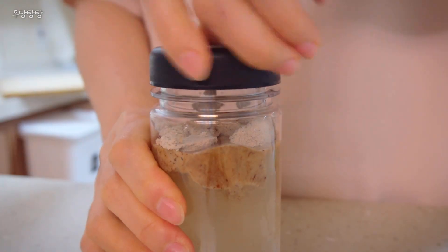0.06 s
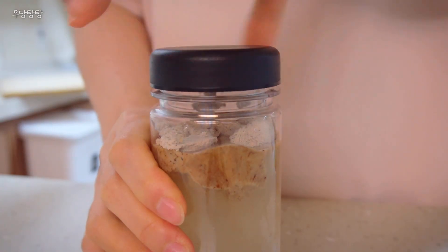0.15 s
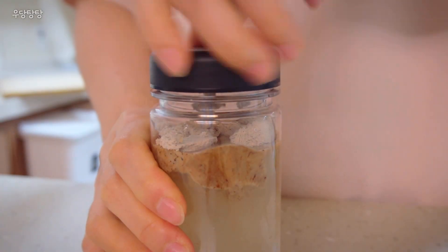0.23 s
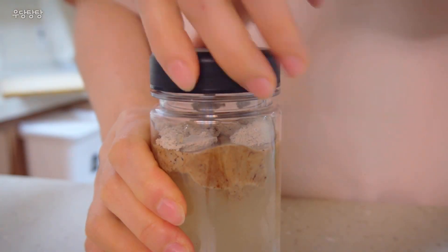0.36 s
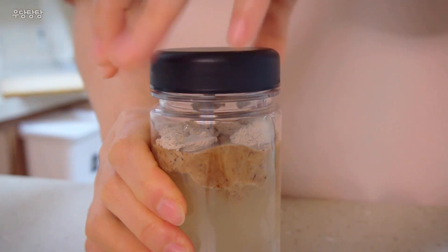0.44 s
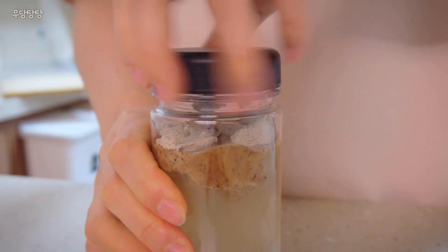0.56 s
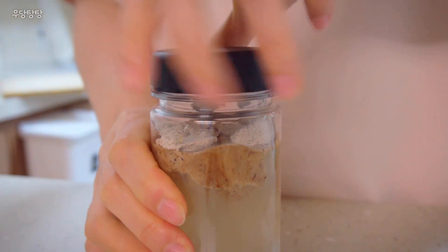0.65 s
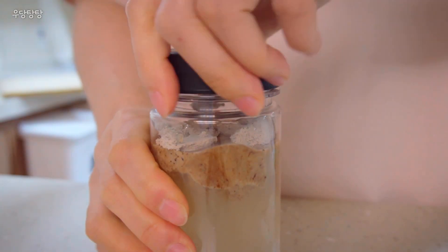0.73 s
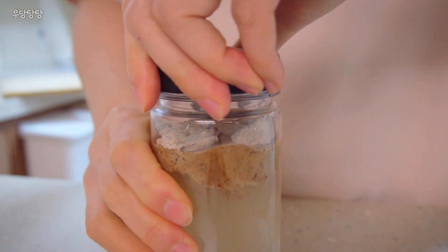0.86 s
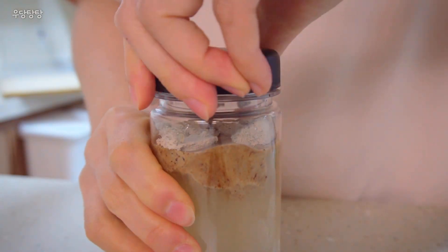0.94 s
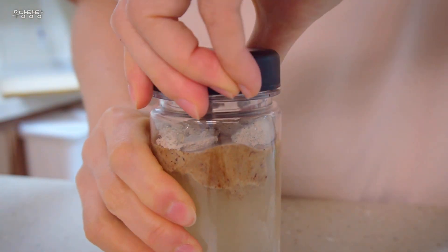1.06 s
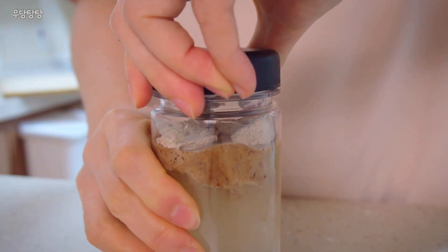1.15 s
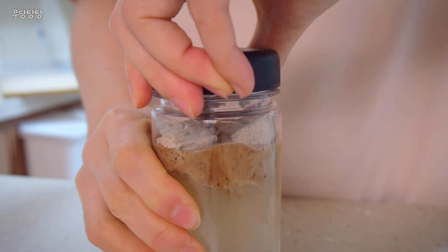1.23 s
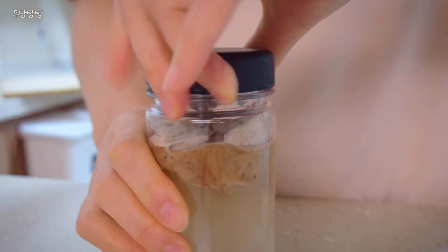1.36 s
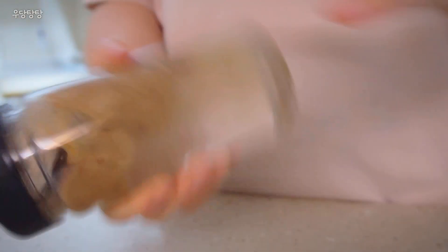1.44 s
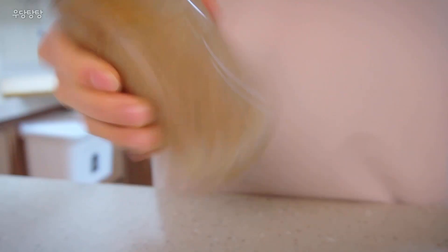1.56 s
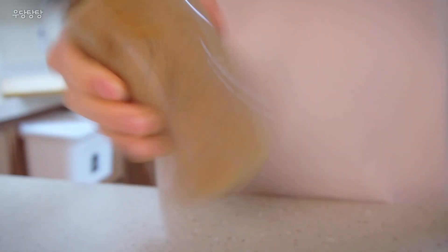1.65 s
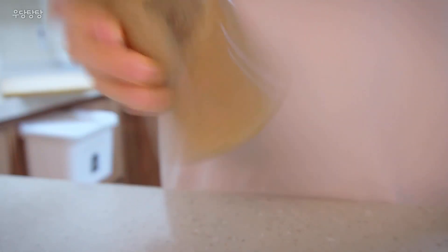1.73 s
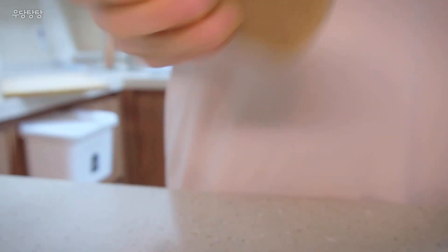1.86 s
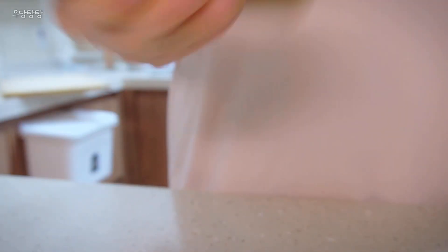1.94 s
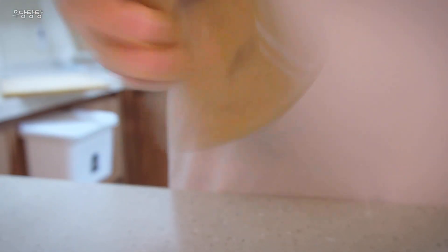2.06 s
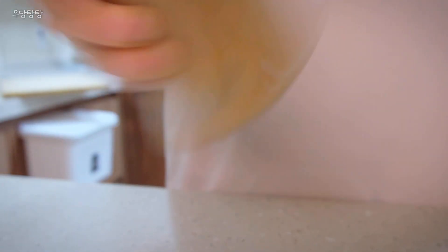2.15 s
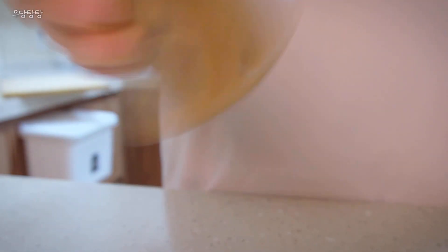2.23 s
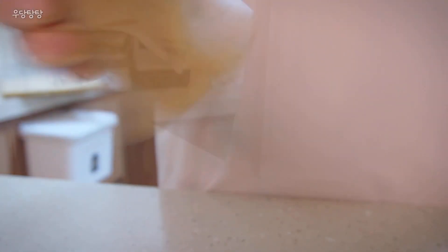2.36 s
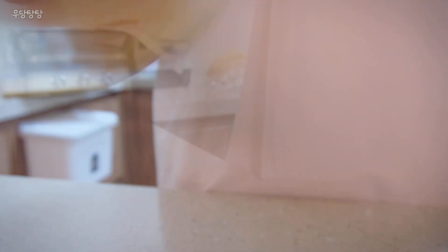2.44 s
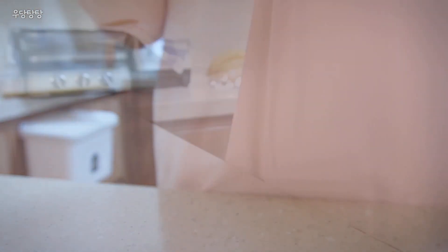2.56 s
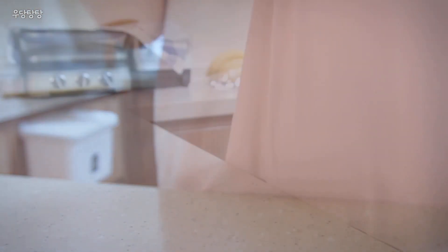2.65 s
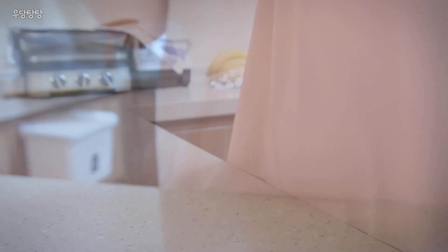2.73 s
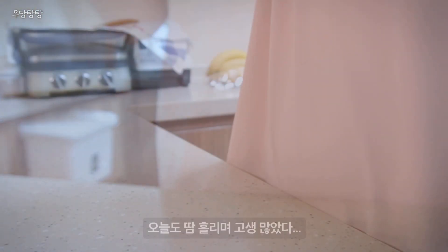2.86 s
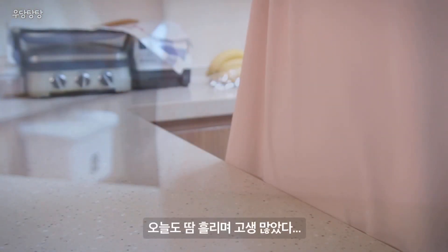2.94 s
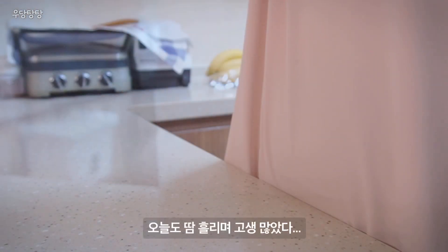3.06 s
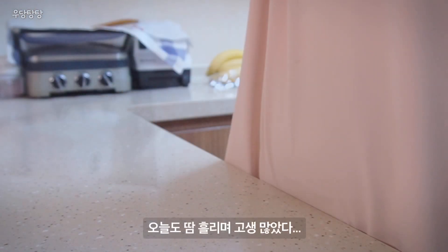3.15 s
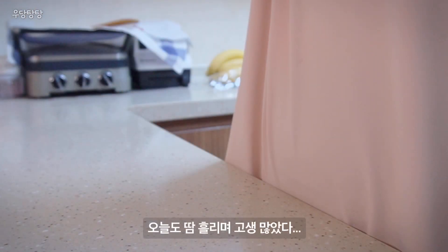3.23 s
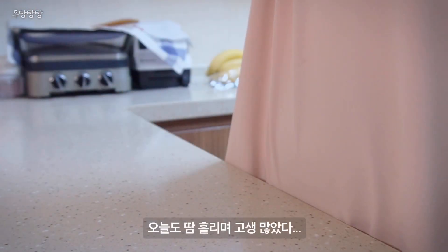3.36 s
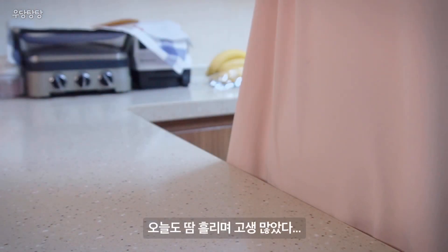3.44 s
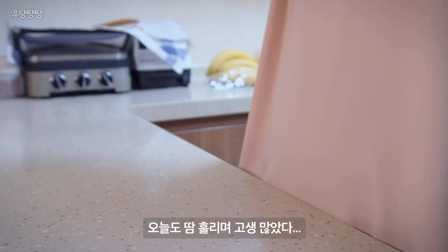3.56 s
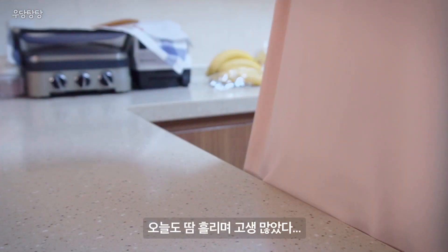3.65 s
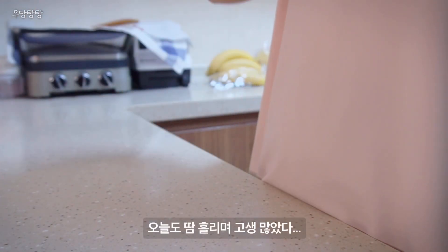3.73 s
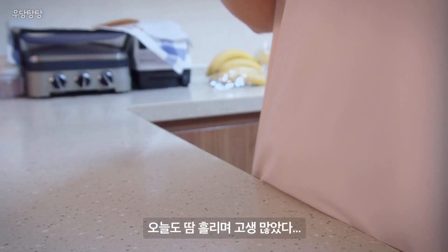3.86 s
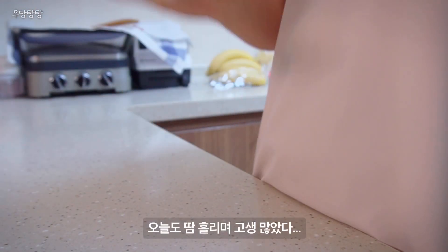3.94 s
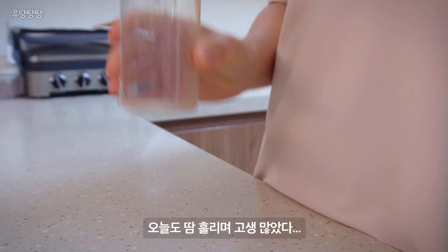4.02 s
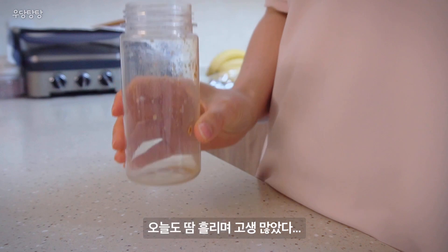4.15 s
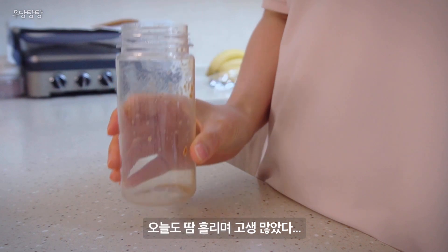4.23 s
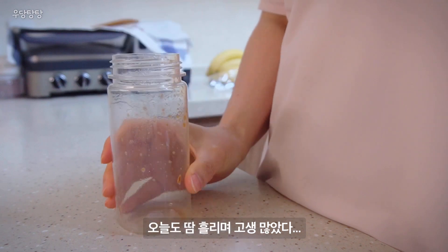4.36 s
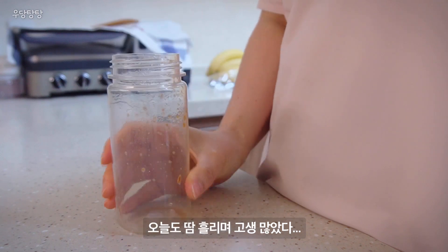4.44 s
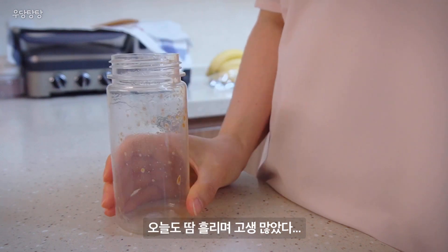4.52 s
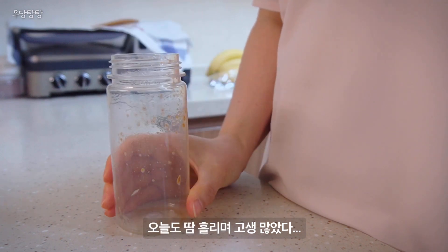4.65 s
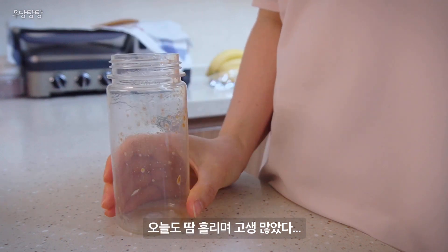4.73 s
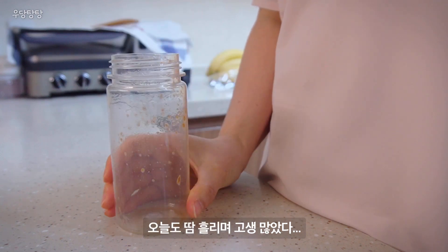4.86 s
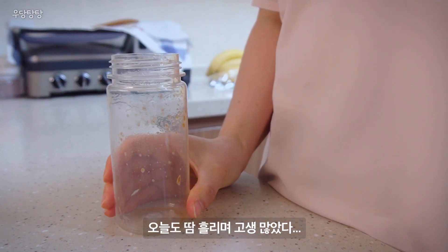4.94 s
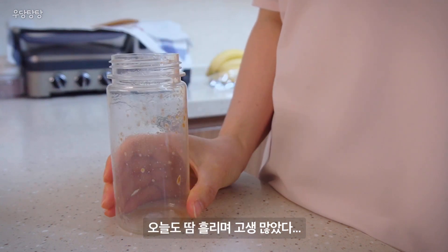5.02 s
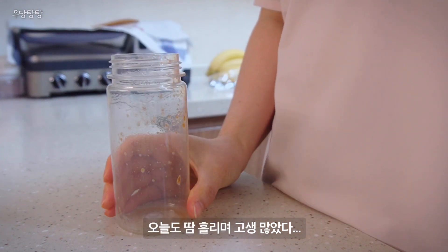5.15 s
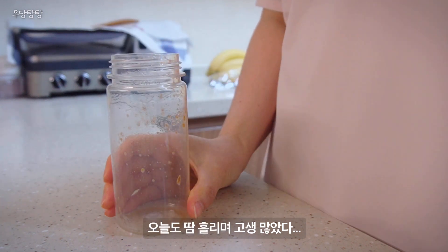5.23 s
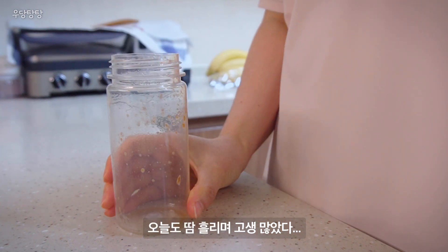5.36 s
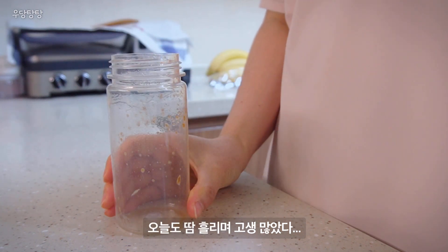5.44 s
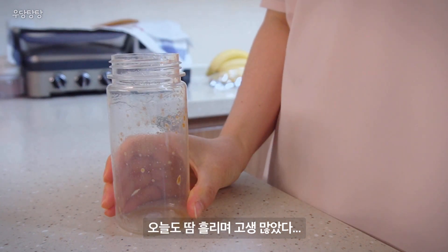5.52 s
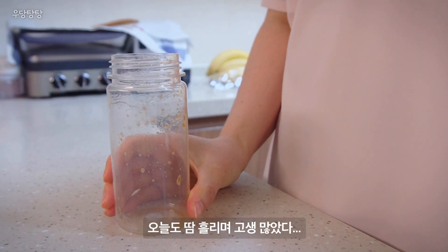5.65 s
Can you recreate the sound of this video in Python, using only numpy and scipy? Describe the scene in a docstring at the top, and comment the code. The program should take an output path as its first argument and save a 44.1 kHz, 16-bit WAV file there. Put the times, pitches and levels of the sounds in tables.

```python
"""In a kitchen, a plastic shaker bottle is closed: lid taps are filtered clicks, the thread is fine crackle.
It is shaken hard: bubble clouds and crackle churn, slaps splash, pockets of air gulp and ice clicks,
until the sound is cut short. Then the bottle is knocked down on the stone counter, as noise cracks
and damped modes. Below it all lie wandering room tone, a rustling sleeve and a thin steady whine."""
import sys
import numpy as np
from scipy import signal
from scipy.fft import rfft, irfft, next_fast_len
from scipy.io import wavfile
from scipy.ndimage import map_coordinates

SR = 44100
rng = np.random.default_rng(int(sys.argv[2]) if len(sys.argv) > 2 else 0)


def log_audio(samples):
    """Write samples as a 16-bit WAV file to the path given in sys.argv[1]."""
    # one column per channel
    frames = np.atleast_2d(samples).T
    # limit to full scale, then quantise
    limited = np.clip(frames, -1, 1)
    pcm = np.round(limited * 32767).astype(np.int16)
    wavfile.write(sys.argv[1], SR, pcm)


N = 250916
T = np.arange(N) / SR
HALF_SECOND = SR // 2  # samples
FREQS = np.maximum(np.arange(N // 2 + 1) * SR / N, 1)  # Hz
SHAKE_START_S, SHAKE_CUT_S = 1.53, 2.809

# resonances of the plastic lid: [f/Hz, width/Hz, relative level/dB]
LID_RESONANCES = [(960, 110, -13), (1360, 100, -2), (1928, 16, 14), (2120, 46, 11.5), (3330, 81, -26),
                  (3950, 79, 5), (6820, 130, -13)]
# water hits an end of the bottle: [t/s, level/dB, f of the trapped air/Hz, wash fall/s, spray level/dB]
WATER_SLAPS = [(1.532, -24, 3028, 0.039, -45), (1.558, -21.5, 3970, 0.021, -35),
               (1.585, -23, 2050, 0.0053, -41), (1.64, -17.5, 2260, 0.031, -51),
               (1.705, -17.5, 2380, 0.0093, -32), (1.736, -17.5, 1740, 0.0058, -43),
               (1.819, -24, 3880, 0.051, -32.5), (1.866, -16, 1540, 0.01, -31.5),
               (1.91, -19, 1390, 0.0078, -36), (1.952, -19, 1420, 0.052, -42),
               (1.988, -18, 1700, 0.2, -34.5), (2.061, -17.5, 1380, 0.14, -25),
               (2.103, -17, 1550, 0.048, -39), (2.152, -18, 2420, 0.0096, -33),
               (2.209, -18.5, 3760, 0.039, -30), (2.283, -13, 2160, 0.011, -36),
               (2.314, -20.5, 1780, 0.0073, -45), (2.336, -30, 2200, 0.013, -36),
               (2.38, -16.5, 1800, 0.023, -34.5), (2.409, -15, 1700, 0.0079, -39),
               (2.468, -16, 1880, 0.17, -30.5), (2.538, -12.5, 1260, 0.024, -33),
               (2.581, -28, 2180, 0.013, -32), (2.622, -14.5, 1420, 0.02, -27),
               (2.644, -16.5, 1290, 0.019, -44), (2.69, -32, 1400, 0.012, -48),
               (2.721, -20.5, 2180, 0.019, -30), (2.746, -15, 1410, 0.02, -33),
               (2.797, -22.5, 1350, 0.018, -38)]
# big pockets of air close: [t/s, level/dB, f/Hz]
AIR_GULPS = [(1.742, -22.5, 604), (1.777, -30.5, 448), (1.943, -30, 540), (1.996, -23, 520),
             (2.036, -26, 474), (2.098, -33, 615), (2.21, -22, 610), (2.214, -35, 397), (2.284, -29, 776),
             (2.471, -24, 910), (2.516, -29, 546), (2.537, -19.5, 520), (2.649, -22, 546)]


def undb(db):
    """Decibels to gain."""
    return 10 ** (np.asarray(db) / 20)


def unit(x):
    """Scale to an rms of one."""
    return x / np.sqrt(np.mean(x ** 2))


def shape(points):
    """Gain at every frequency from (Hz, dB) points, falling away below the first and level above the last."""
    hz, db = np.transpose(points)
    return undb(np.interp(np.log(FREQS), np.log(hz), db)) * np.minimum(FREQS / hz[0], 1) ** 2


def lowpass(edge_hz, power):
    """Smooth gain curve that is one in the bass and a half at its edge."""
    return 1 / (1 + (FREQS / edge_hz) ** power)


def resonance(hz, width):
    """Response of one resonance, gain 1 at its centre."""
    return 1 / (1 + 1j * (FREQS ** 2 - hz ** 2) / (FREQS * width))


def rings(peaks, db):
    """Response of a wall whose resonances are added to a flat spectrum."""
    return 1 + undb(db) * sum(undb(d) * resonance(hz, width) for hz, width, d in peaks)


def colour(x, response):
    """Filter a steady sound and bring it to an rms of one."""
    size = next_fast_len(N, True)
    hz = np.arange(size // 2 + 1) * SR / size
    spectrum = rfft(x, size) * np.interp(hz, FREQS, response)
    return unit(irfft(spectrum, size)[..., :N])


def noise(alike=0.):
    """White noise in two channels; alike is the correlation between them."""
    mid, side = rng.standard_normal((2, N))
    c = np.clip(alike, -1, 1)
    return mid * np.sqrt((1 + c) / 2) + side * np.sqrt((1 - c) / 2) * np.array([[1], [-1]])


def crackle(rate, spread_db):
    """Random clicks, rate per second, of very unequal size and with unrelated levels left and right."""
    hits = rng.random(N) < rate / SR
    size_db = spread_db * np.minimum(rng.exponential(size=N), 4)
    return hits * noise() * undb(size_db)


def walk(rate):
    """A random wander with a spread near one, taking rate new values per second."""
    return np.interp(T * rate, np.arange(2000), rng.standard_normal(2000))


def restless(x, low_hz, high_hz, depth_db, rate, count):
    """Let neighbouring parts of the spectrum swell and sink on their own."""
    size = next_fast_len(N, True)
    hz = np.arange(size // 2 + 1) * SR / size
    place = np.interp(np.log(1 + hz), np.log([low_hz, high_hz]), [0, count - 1])
    spectrum = rfft(x, size)
    out = np.zeros((2, N))
    for k in range(count):
        band = irfft(spectrum * np.maximum(1 - abs(place - k), 0), size)[:, :N]
        out += band * undb(depth_db * walk(rate))
    return out


def add(out, s, x):
    """Mix a short sound in at time s."""
    i = max(int(s * SR), 0)
    out[..., i:i + x.shape[-1]] += x[..., :N - i]


def fade(t60):
    """Exponential decay, half a second long."""
    return np.exp(-np.log(1000) * T[:HALF_SECOND] / t60)


def excerpt(source, s):
    """Half a second of a steady source from time s."""
    return source[:, int(s * SR):][:, :HALF_SECOND]


def burst(source, s, t60, rise_s):
    """The piece of a steady source at time s, swelling quickly and dying away."""
    envelope = fade(t60) * (1 - np.exp(-T[:HALF_SECOND] / rise_s)) ** 2
    return excerpt(source, s) * envelope / envelope.max()


def swell(s, rise, fall):
    """Envelope that grows exponentially to one at time s and dies away; rise and fall are time constants."""
    return np.exp(-np.minimum(np.maximum((s - T) / rise, (T - s) / fall), 30))


def ring(hz, t60, lag_s=0., glide=0.):
    """One damped mode, lagging on the right; a positive glide raises its pitch like a bubble's."""
    t = T[:HALF_SECOND]
    heard_t = t - np.array([[0], [lag_s]])
    wave = np.sin(2 * np.pi * hz * heard_t * (1 + glide * t / t60))
    return wave * fade(t60) * (1 - np.exp(-2 * hz * t))


def bubbles(low_hz, high_hz, cycles, glide, spread_db, count):
    """A cloud of bubbles through the shake; each rings for a few cycles and rises in pitch."""
    when, pitch, size, life, place = rng.random((count, 5)).T[..., None]
    hz = low_hz * (high_hz / low_hz) ** pitch
    k = np.arange(int(cycles * SR / low_hz))
    turns = hz * k / SR
    age = np.minimum(turns / (cycles * (.5 + life)), 2)
    decay = np.exp(-np.log(100) * age)
    envelope = decay * np.sqrt(hz / low_hz) * undb(-spread_db * np.log(size + .02))
    start = ((SHAKE_START_S + when * (SHAKE_CUT_S - SHAKE_START_S)) * SR).astype(int)
    sides = []
    for lag in (0, place):  # each bubble has its own phase on the right
        wave = envelope * np.sin(2 * np.pi * (turns * (1 + glide * age) + lag))
        sides.append(np.bincount((start + k).ravel(), wave.ravel(), N))
    return np.array(sides)


def kitchen(x, wet_db):
    """Direct sound plus the room's tail of decaying noise, unrelated left and right."""
    t60_s, treble_t60_s = 0.41, 0.48
    t = T[:HALF_SECOND]
    tail = rng.standard_normal((2, len(t)))
    dull = signal.sosfilt(signal.butter(1, 3000, fs=SR, output="sos"), tail)
    tail = (dull * fade(t60_s) + (tail - dull) * fade(treble_t60_s)) * (t > .004)
    tail = unit(tail) / np.sqrt(len(t))
    return x + signal.fftconvolve(x, undb(wet_db) * tail, axes=1)[:, :N]


def room():
    """Room tone is shaped noise whose bass wanders; a sleeve rustles as noise swells; a sine whines."""
    # spectrum of the quiet room: [f/Hz, level/dB]
    tone_colour = shape([(15, -42), (25, -17.5), (65, -5), (119, -9.5), (164, -2), (301, -8), (353, -6),
                         (846, -15.5), (916, -13.5), (2140, -17.5), (4030, -22), (6330, -26.5),
                         (14000, -34.5)])
    # the arm moves in its sleeve: [t of the peak/s, level/dB, rise/s, fall/s]
    sleeve_moves = [(3.03, -64.5, 0.16, .2), (3.5, -64.5, 0.11, 0.63), (4.24, -57.5, 0.24, 0.24)]
    tone_db, whine_db, whine_hz = -55, -73.5, 15644
    bass = lowpass(450, 4)
    rumble = restless(noise(alike=0.098), 36.5, 434, depth_db=3.5, rate=16, count=9)
    rumble = colour(rumble * undb(0.5 * walk(5.76)), tone_colour * np.sqrt(bass))
    air = colour(noise(alike=-0.048), tone_colour * np.sqrt(1 - bass))
    tone = unit(rumble + undb(-1.0) * air)
    moves = sum(undb(db) * swell(s, rise, fall) for s, db, rise, fall in sleeve_moves)
    sleeve = moves * colour(noise(), resonance(3100, 3300) ** 2)
    return undb(tone_db) * tone + sleeve + undb(whine_db) * np.sin(2 * np.pi * whine_hz * T)


def judder():
    """Stick and slip: each uneven slip starts sharply and sinks until the next."""
    slips_per_s, depth_db = 170, 8
    phase = np.cumsum(slips_per_s * np.exp(0.23 * walk(120))) / SR
    return unit(undb(-depth_db * (phase % 1)))


def thread():
    """Fine crackle of the turning lid, with louder slides that stick and slip."""
    # spectrum of plastic thread on thread: [f/Hz, level/dB]
    thread_colour = shape([(240, 2.5), (400, -2), (680, -6), (1210, -5), (1820, -3.5), (2620, -4.5),
                           (7350, -0.5), (15000, -17.5)])
    # the thread catches and slides: [t of the peak/s, level/dB, rise/s, fall/s, f/Hz, width/share of f]
    slides = [(0.227, -38.5, .006, 0.039, 620, 1.2), (.356, -37, 0.0089, .03, 845, 1.3),
              (.448, -39.5, 0.025, 0.0075, 6850, 1.4), (.45, -45, 0.045, 0.0071, 2180, .5),
              (.616, -36, 0.036, 0.0067, 5500, 1.2), (.77, -52.5, 0.035, 0.018, 5470, 1.4),
              (0.827, -41, 0.0043, 0.039, 1400, 0.78), (1.0, -52.5, 0.023, 0.067, 5750, 1.4),
              (1.09, -47.5, 0.13, 0.035, 2510, 1.06)]
    rub_db, rub_fade_db_per_s = -50, 0.5
    bites_s, hiss_db, hiss_rise_s, hiss_fade_db_per_s = 0.41, -54, 0.44, 9.5
    tight_s, release_s = 1.024, 0.23
    grit_per_s, grit_db = 71, -16  # powder caught in the thread; share of the rub
    uneven_db, jerks_per_s = 2.5, 39  # the thread binds and frees

    turning = np.exp(-np.maximum(T - tight_s, 0) / release_s)
    rub = turning * undb(rub_db - rub_fade_db_per_s * T)
    # the hiss grows until the thread bites, then wanes
    since = T - bites_s
    growth = np.exp(np.minimum(since, 0) / hiss_rise_s)
    hiss = turning * growth * undb(hiss_db - hiss_fade_db_per_s * np.maximum(since, 0))
    low = lowpass(5000, 6)
    out = rub * colour(crackle(7000, 0.76), thread_colour * low)
    out += hiss * colour(crackle(9000, 0.83), thread_colour * (1 - low))
    grit = colour(crackle(grit_per_s, 0.83), thread_colour * rings(LID_RESONANCES, -4.0))
    out += rub * undb(grit_db) * grit
    out *= undb(uneven_db * walk(jerks_per_s))

    grain = colour(judder() * crackle(11000, 1.6), lowpass(11000, 6))
    for s, db, rise, fall, hz, width in slides:
        out += undb(db) * swell(s, rise, fall) * colour(grain, resonance(hz, width * hz) ** 2)
    return kitchen(out, wet_db=-7)


def lid():
    """Plastic chatters on plastic: each tap is a short cluster of clicks filtered by the lid's resonances."""
    # the lid meets the neck, and later knocks in the hand: [t/s, level/dB, t60/s, treble edge/Hz]
    taps = [(0.089, -27, 0.071, 3140), (.125, -28, 0.034, 3970), (0.137, -35, 0.023, 7600),
            (.212, -35, 0.051, 2500), (0.219, -24.5, 0.24, 3430), (0.252, -24, 0.041, 2860),
            (0.342, -30.5, 0.44, 8900), (0.356, -33, 0.075, 4480), (.393, -20, 0.03, 4460),
            (0.548, -38.5, 0.023, 8900), (0.702, -43.5, 0.046, 6050), (0.835, -38, 0.046, 3640),
            (0.981, -40.5, 0.082, 2470), (1.174, -39.5, 0.044, 6200), (1.349, -49.5, 0.074, 7140),
            (1.402, -48.5, 0.2, 7900), (1.465, -43, 0.03, 5060), (1.471, -26, 0.033, 5800),
            (1.484, -30, 0.028, 9800)]
    # spectrum of the taps before resonance and treble lift: [f/Hz, level/dB]
    lid_colour = shape([(120, -18), (200, -11), (370, -6), (624, -16), (789, -6.5), (849, -14), (1040, -5),
                        (1200, -8.5), (1360, -5.5), (2090, -5.5), (4010, -9.5), (15000, -19.5)])
    # fingers shift on the bottle: [t/s, level/dB, f/Hz]
    finger_ticks = [(4.694, -61, 7010), (4.757, -57, 4450)]
    response = lid_colour * rings(LID_RESONANCES, -9.5) * (1 + FREQS / 7000)
    chatter = colour(crackle(9000, 1.0), response)
    out = np.zeros((2, N))
    for s, db, t60, edge_hz in taps:
        soft = signal.butter(4, min(edge_hz, SR / 3), fs=SR, output="sos")
        add(out, s, undb(db) * signal.sosfilt(soft, burst(chatter, s, t60, 0.0038)))
    for s, db, hz in finger_ticks:
        tick = colour(noise(), resonance(hz, 560))
        add(out, s, undb(db) * burst(tick, s, 0.031, 0.0023))
    return kitchen(out, wet_db=-8.5)


def thumps():
    """Soft pushes ring the filled bottle and the counter low down: a damped sine with a little dull noise."""
    # the hands push on lid and bottle: [t/s, level/dB, f/Hz, t60/s]
    pushes = [(0.095, -40, 75, 0.085), (0.136, -41, 215, 0.042), (.138, -30.5, 368, 0.057),
              (.213, -36, 367, 0.13), (.228, -42, 172, 0.24), (.26, -36.5, 172, 0.33),
              (.258, -33, 506, 0.028), (.351, -31, 210, 0.048), (0.357, -39, 368, 0.051),
              (.396, -29.5, 552, 0.025), (0.399, -34, 300, 0.12), (0.553, -45.5, 131, 0.14),
              (.618, -41, 202, 0.096), (0.702, -42, 147, 0.098), (0.836, -42, 298, 0.057),
              (.981, -35.5, 160, 0.12), (1.18, -31.5, 151.6, 0.1), (1.345, -40.5, 147, 0.062),
              (1.392, -46, 152.6, 0.35), (1.48, -54, 165, 0.32)]
    # the hand takes hold of the bottle: [t of the peak/s, level/dB, rise/s, fall/s]
    grips = [(1.23, -58, 0.015, 0.051), (1.41, -58, 0.03, .05)]
    flesh = colour(noise(alike=0.7), resonance(151, 146) ** 2)
    out = np.zeros((2, N))
    for s, db, hz, t60 in pushes:
        pat = undb(-13.5) * burst(flesh, s, t60, 0.00097)
        add(out, s, undb(db) * (ring(hz, t60, lag_s=0.00022) + pat))
    out += flesh * sum(undb(db) * swell(s, rise, fall) for s, db, rise, fall in grips)
    return kitchen(out, wet_db=-14.0)


def water_motion():
    """Churn follows effort, roll and slosh the rolling; slaps feed churn and spray, gulps feed roll."""
    # how hard the arm shakes: [t/s, churning level/dB]
    effort_curve = [(1.54, -37), (1.63, -38), (1.736, -33.5), (1.768, -35), (2.038, -32), (2.528, -29.5),
                    (2.8, -33.5)]
    # how much water rolls from end to end: [t/s, low rumble level/dB, hollow slosh level/dB]
    rolling = [(1.53, -80, -56), (1.592, -45.5, -55), (1.734, -44, -51), (1.908, -47.5, -45.5),
               (1.996, -37, -47.5), (2.088, -50.5, -42.5), (2.166, -38, -42.5), (2.198, -47, -44),
               (2.212, -44, -37), (2.244, -58, -46.5), (2.29, -47, -35), (2.34, -45.5, -45.5),
               (2.506, -41, -45), (2.54, -34.5, -38.5), (2.608, -43, -39), (2.662, -41, -35.5),
               (2.718, -52.5, -49), (2.756, -37, -40), (2.782, -52, -61), (2.8, -68, -42.5)]
    start_s = .02  # time constant: the water breaks loose with the first stroke
    mist_db, spray_fall_s = -40, 0.011  # fine spray between the slaps, and the fall of each throw
    wash_rise_s, wash_db = 0.0087, -11  # after a slap the water washes along the wall
    gulp_roll_db, gulp_rise_s, gulp_fall_s = -17.5, 0.005, 0.011  # water rolls in around each pocket

    effort = undb(np.interp(T, *np.transpose(effort_curve)))
    moving = 1 - np.exp(-np.maximum(T - SHAKE_START_S, 0) / start_s)
    # surges add up as power
    wash, thrown, inrush = np.zeros((3, N))
    for s, db, _, wash_fall, spray_db in WATER_SLAPS:
        peak_s = s + wash_rise_s
        wash += (undb(db + wash_db) * swell(peak_s, wash_rise_s, wash_fall)) ** 2
        thrown += (undb(spray_db) * swell(peak_s, wash_rise_s, spray_fall_s)) ** 2
    for s, db, _ in AIR_GULPS:
        inrush += (undb(db + gulp_roll_db) * swell(s + gulp_rise_s, gulp_rise_s, gulp_fall_s)) ** 2
    times, rumble_db, slosh_db = np.transpose(rolling)
    churn = np.sqrt((moving * effort) ** 2 + wash)
    roll = np.sqrt((moving * undb(np.interp(T, times, rumble_db))) ** 2 + inrush)
    slosh = moving * undb(np.interp(T, times, slosh_db))
    spray = np.sqrt((moving * undb(mist_db)) ** 2 + thrown)
    return churn, roll, slosh, spray


def slaps(wall):
    """Each landing bursts into crackling drops around a resonant pocket of air; big pockets gulp upwards."""
    splash = colour(crackle(7000, 0.97), wall / np.sqrt(1 + (550 / FREQS) ** 4))
    out = np.zeros((2, N))
    for s, db, hz, _, _ in WATER_SLAPS:
        drops = burst(splash, s, 0.066, 0.0013)
        pocket = signal.lfilter(*signal.iirpeak(hz, 9, fs=SR), drops)
        add(out, s, undb(db) * (undb(-17.5) * drops + undb(-1.0) * pocket))
    for s, db, hz in AIR_GULPS:
        add(out, s, undb(db) * ring(hz, 22 / hz, lag_s=0.00025, glide=0.055))
    return out


def ice():
    """Each cube gives a hard, short click on the wall: resonant noise dying fast."""
    # ice cubes strike the wall: [t/s, level/dB, f/Hz]
    hits = [(1.586, -30, 7500), (1.642, -27, 2300), (1.66, -29, 7100), (1.742, -25.5, 4530),
            (1.819, -30, 5470), (1.87, -24, 2401), (1.895, -29, 6002), (1.947, -31, 6500),
            (2.014, -29, 7000), (2.064, -24, 5400), (2.092, -32, 6500), (2.128, -21.5, 5000),
            (2.154, -24, 3500), (2.211, -24, 5500), (2.234, -41, 6860), (2.284, -26, 2300),
            (2.34, -30, 2980), (2.393, -32, 7000), (2.407, -28, 7500), (2.417, -24, 2200),
            (2.449, -33, 6000), (2.467, -27, 5000), (2.49, -25, 4500), (2.547, -36, 4200),
            (2.606, -37, 6500), (2.646, -29, 2500), (2.805, -26, 5900)]
    t60_s, width = 0.01, 0.57  # width as a share of the pitch
    contact = noise()
    soft = signal.butter(2, 10500, fs=SR, output="sos")
    out = np.zeros((2, N))
    for s, db, hz in hits:
        click = signal.lfilter(*signal.iirpeak(hz, 1 / width, fs=SR), excerpt(contact, s))
        click = unit(signal.sosfilt(soft, click))
        add(out, s, undb(db) * burst(click, 0, t60_s, 0.00021))
    return out


def air_space(x):
    """One bounce between lid and water; the gap keeps changing, so the comb of resonances slides."""
    length_m, swing, rate_hz = 0.149, 0.286, 12  # typical length, its relative wander, how fast
    round_trip_s = 2 * length_m * np.exp(swing * walk(rate_hz)) / 343
    echo = undb(-7)
    bounced = np.array([map_coordinates(side, [(T - round_trip_s) * SR]) for side in x])
    return (x + echo * bounced) / np.hypot(1, echo)


def shaking():
    """Bubble clouds and crackle make foam, spray and rolling water, stopping dead at the end."""
    # spectrum of water in the bottle, before the wall rings: [f/Hz, level/dB]
    water_colour = shape([(71, -44), (120, -19), (173, -11.5), (300, -10), (545, 0), (733, -6), (796, -6.5),
                          (863, -7.5), (1870, -1.5), (3170, -4), (3810, -3), (6210, -9), (11200, -26.5),
                          (15500, -40)])
    # resonances of the bottle wall: [f/Hz, relative level/dB]
    wall_rings = [(530, -7.5), (942, -1.5), (1272, -24), (1388, -12), (1611, -0.5), (1900, -8), (2776, 2),
                  (3386, -3), (3566, -7), (3682, 1), (4338, 3.5)]
    wall_width_hz = 8.9
    foam_db, churn_db, rattle_db = -7.5, -7.5, -12  # shares of the churn
    pockets_db, roll_db = -5, -3  # shares of the rolling
    rattle_per_s = 220  # small chips of ice
    lumps_db, lumps_per_s = 2.2, 44

    churn, roll, slosh, spray = water_motion()
    wall = water_colour * rings([(hz, wall_width_hz, db) for hz, db in wall_rings], 0.46)
    deep, bass = lowpass(750, 10), lowpass(1300, 10)
    treble = 1 / (1 + (5000 / FREQS) ** 6)
    middle = wall * np.sqrt((1 - bass) * (1 - treble))
    foam = colour(bubbles(1100, 7000, cycles=30, glide=0.07, spread_db=1.8, count=2300), middle)
    pockets = bubbles(361.5, 1505, cycles=14, glide=0.14, spread_db=2, count=900)
    out = churn * (undb(foam_db) * foam + undb(churn_db) * colour(crackle(6000, 0.74), middle))
    chip_colour = wall * np.sqrt(1 - bass) * (1 + FREQS / 9000)
    out += churn * undb(rattle_db) * colour(crackle(rattle_per_s, 0.88), chip_colour)
    deep_band, hollow_band = wall * np.sqrt(deep), wall * np.sqrt(bass * (1 - deep))
    for strength, band in (roll, deep_band), (slosh, hollow_band):
        rush = undb(roll_db) * colour(crackle(2500, 2.6), band)
        out += strength * (undb(pockets_db) * colour(pockets, band) + rush)
    out += spray * colour(crackle(5000, 0.81), wall * np.sqrt(treble))
    # the water tears into lumps: its bands and its level flutter
    out = restless(out, 524, 9030, depth_db=lumps_db, rate=lumps_per_s, count=18)
    out *= undb(0.35 * walk(90))
    heard = kitchen(air_space(out + slaps(wall) + ice()), wet_db=-7.5)
    cut = np.exp(-np.maximum(T - SHAKE_CUT_S, 0) / 0.0036)
    return heard * cut * undb(np.array([[1], [-1]]) * .5)  # leans slightly left


def knock():
    """The base strikes stone: a noise crack at each contact, and damped modes of bottle and counter."""
    # the base lands rim first, then flat: [t/s, crack level/dB, treble edge/Hz]
    landing = [(4.368, -41.5, 4000), (4.376, -32, 6000), (4.382, -20, 13000), (4.388, -22.5, 7100),
               (4.395, -25.5, 1600)]
    # modes of the bottle: [f/Hz, relative level/dB, t60/s]
    base_modes = [(988, -17, 0.36), (1200, -16, 0.35), (1273, -3, 0.06), (1590, -13, 0.44),
                  (2050, -15, .25), (2164, -20, 0.38), (2280, 8, .035), (2330, -8.5, 0.34),
                  (2401, -13.5, 0.51), (2590, -8, .18), (2810, -5, 0.039), (2903, -15, 0.29),
                  (3310, -8.5, 0.24), (3430, -17, .25), (3700, -14, 0.31), (4398, -24, 0.49),
                  (4533, -28, .25), (5300, -15, .2), (5604, -22, .3), (5965, -27, .27), (6315, -21, .12),
                  (7100, -22, .35), (7660, -17, 0.36), (8350, -21, 0.4)]
    # spectrum of the crack: [f/Hz, level/dB]
    base_colour = shape([(45, -26), (80, -10), (151, -4), (333, -13), (489, -3.5), (829, -20), (1280, -6.5),
                         (1740, -16.5), (2020, -12), (2890, -9.5), (3850, -22.5), (6530, -22), (9820, -36),
                         (15500, -51)])
    # modes of the counter and the bottle on it: [f/Hz, relative level/dB, t60/s]
    counter_modes = [(128, -9, 0.11), (151.7, -0.5, 0.23), (157.7, -14.5, 0.75), (242.7, -10.5, 0.42),
                     (381, -10, 0.38), (455, -7, 0.47), (482.8, 0, 0.34), (490, 5, 0.072), (560, -14, .2)]
    bottle_s, bottle_db = 4.381, -23.5  # the hardest contact rings the bottle
    counter_s, counter_db = 4.385, -28  # its weight then arrives on the counter
    rim_hz, rim_db, rim_t60_s = 1284, -29.5, .8  # the base sings while it stands on its rim
    settles_s, settle_fall_s = 4.483, 0.0069  # lying flat damps it
    click_db, click_t60_s = -34, 0.005

    grit = colour(noise(alike=0.034), base_colour * FREQS / (FREQS + 120))
    bottle = sum(undb(db) * ring(hz, t60, lag_s=.00008) for hz, db, t60 in base_modes)
    counter = sum(undb(db) * ring(hz, t60, lag_s=0.00031) for hz, db, t60 in counter_modes)
    settled = np.maximum(T[:HALF_SECOND] + bottle_s - settles_s, 0)
    rim = ring(rim_hz, rim_t60_s, lag_s=.00008) * np.exp(-settled / settle_fall_s)
    crack, ringing, singing, click = np.zeros((4, 2, N))
    for s, db, edge_hz in landing:
        soft = signal.butter(2, min(edge_hz, SR / 3), fs=SR, output="sos")
        add(crack, s, undb(db) * signal.sosfilt(soft, burst(grit, s, 0.055, 0.0025)))
    add(ringing, bottle_s, undb(bottle_db) * bottle)
    add(ringing, counter_s, undb(counter_db) * counter)
    add(singing, bottle_s, undb(rim_db) * rim)
    # the hardest contact with the stone also gives a bright click
    hardest_s = max(landing, key=lambda row: row[1])[0]
    bright = colour(noise(), resonance(9000, 9000))
    add(click, hardest_s, undb(click_db) * burst(bright, hardest_s, click_t60_s, 0.00027))
    out = click + kitchen(crack, wet_db=-5.5)
    return out + kitchen(ringing, wet_db=-13) + kitchen(singing, wet_db=-16)


def scene():
    """Closing, shaking and setting down, over the room."""
    return room() + thread() + lid() + thumps() + shaking() + knock()


def record(dry):
    """A steep low-pass cuts the top of the treble."""
    top_hz = 15850
    return signal.sosfilt(signal.ellip(10, .2, 80, top_hz, fs=SR, output="sos"), dry)


dry = scene()
out = record(dry)
log_audio(out)
```